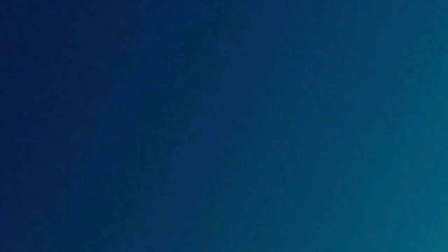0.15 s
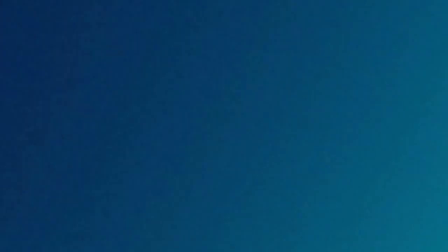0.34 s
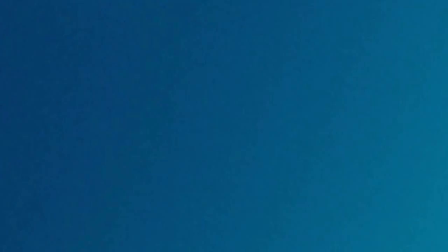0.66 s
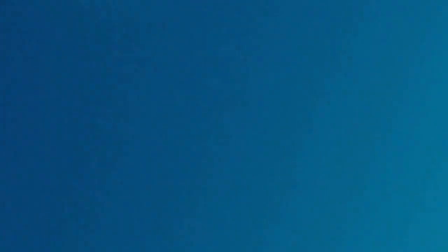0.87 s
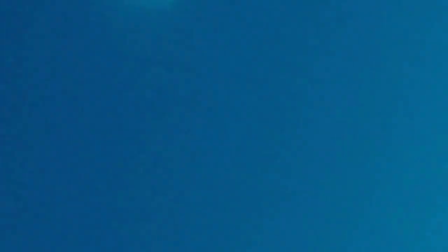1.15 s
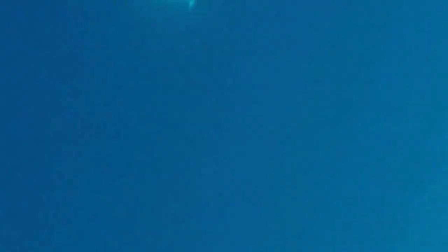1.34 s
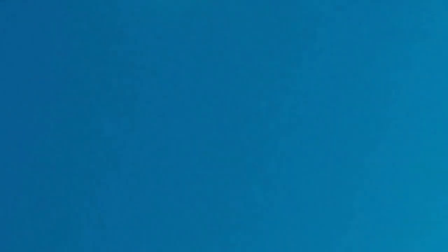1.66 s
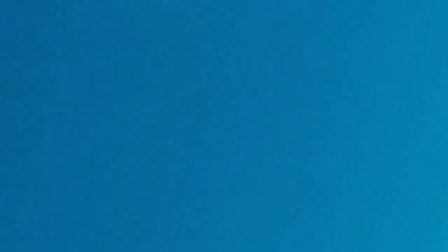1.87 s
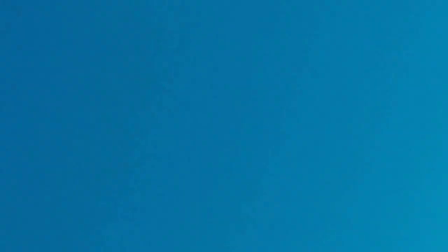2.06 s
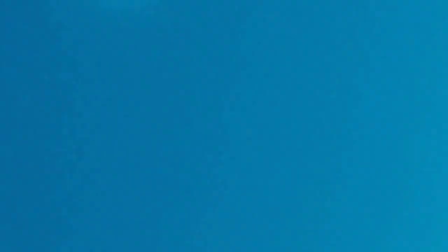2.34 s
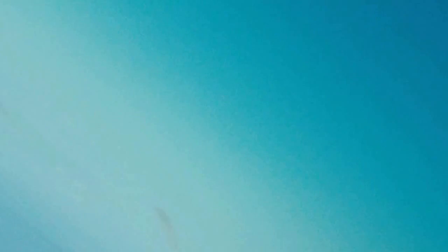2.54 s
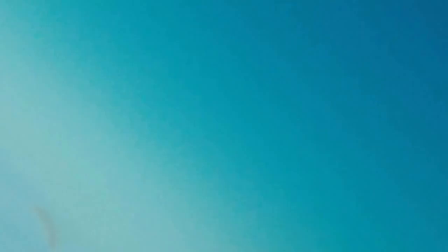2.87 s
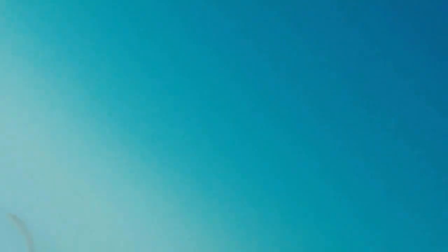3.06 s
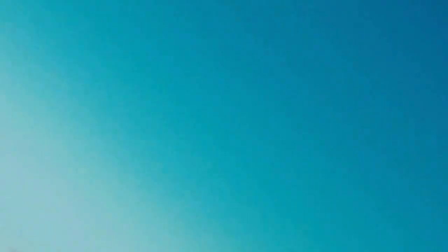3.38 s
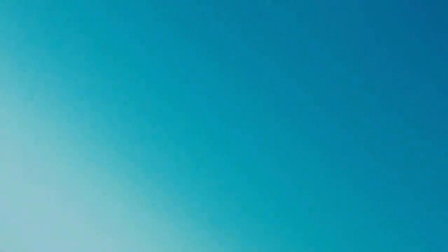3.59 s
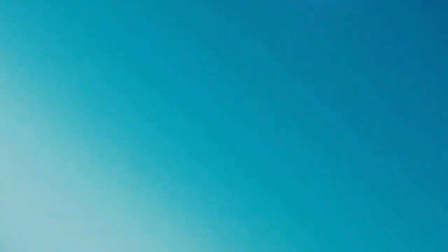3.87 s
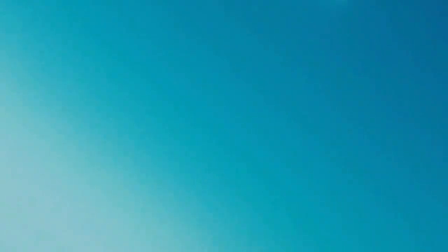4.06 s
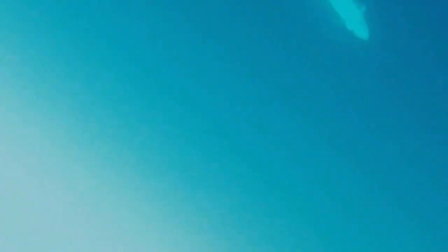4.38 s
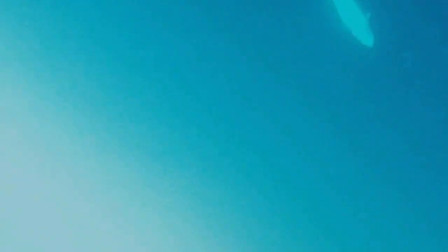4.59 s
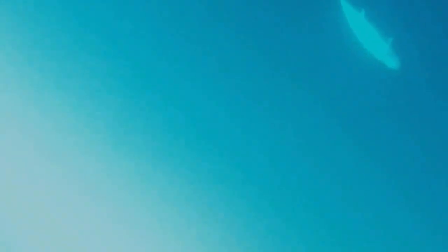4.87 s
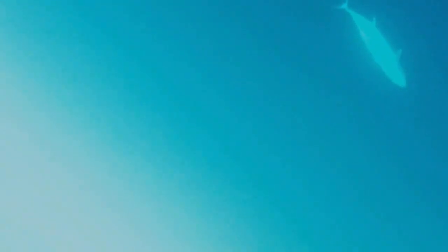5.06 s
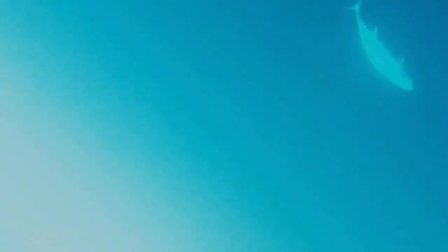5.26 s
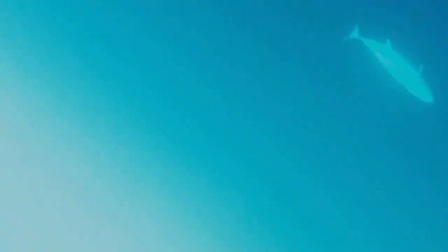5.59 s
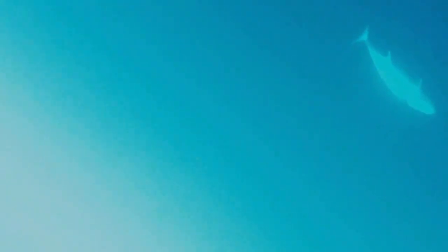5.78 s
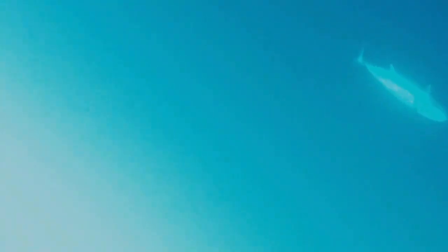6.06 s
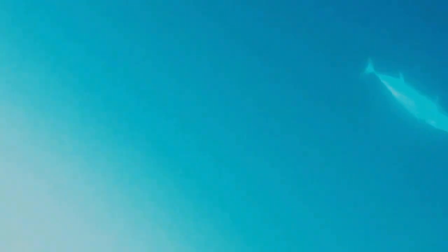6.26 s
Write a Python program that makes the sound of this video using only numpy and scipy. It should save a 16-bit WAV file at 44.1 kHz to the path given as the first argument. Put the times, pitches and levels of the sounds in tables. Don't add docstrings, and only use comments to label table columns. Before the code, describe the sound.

Loud distorted gurgles and crackling bubbles as a microphone is dunked in water, settling into deep rumbling surges, faint clicks and a late knock.

```python
import sys
import numpy as np
from scipy import signal
from scipy.fft import rfft, irfft, next_fast_len
from scipy.io import wavfile
from scipy.ndimage import map_coordinates

SR = 44100
rng = np.random.default_rng(int(sys.argv[2]) if len(sys.argv) > 2 else 0)


def put_to_file(sound):
    columns = np.atleast_2d(sound).T
    safe = np.clip(columns, -1, 1)
    whole_steps = np.round(safe * 32767)
    wavfile.write(sys.argv[1], SR, whole_steps.astype(np.int16))


def nominal_scale(level):
    x = np.asarray(level, float) / 20
    return 10 ** x


N = 283640
TIME_S = np.arange(N) / SR
AIR_SPENT_S = 2.35


def unit(x):
    return x / np.sqrt(np.mean(np.abs(x) ** 2) + 1e-20)


def curves(rows):
    start_s, *columns = np.transpose(rows)
    return [np.interp(TIME_S, start_s, column) for column in columns]


def wobble(rate_hz):
    knots = rng.standard_normal(int(N * rate_hz / SR) + 4)
    return map_coordinates(knots, [np.arange(N) * rate_hz / SR])


def filtered(x, response):
    size = next_fast_len(len(x) + 8192)
    spectrum = rfft(x, size) * response(np.fft.rfftfreq(size, 1 / SR))
    return irfft(spectrum, size)[:len(x)]


def colour(points):
    point_hz, level_db = np.transpose(points)
    return lambda hz: nominal_scale(np.interp(np.log(hz + 1), np.log(point_hz + 1), level_db))


def noise(points):
    return unit(filtered(rng.standard_normal(N), colour(points)))


def resonances(modes):
    def response(f):
        total = 0
        for k, (centre, width, db) in enumerate(modes):
            damping = 1j * f * width
            total = total + (-1) ** k * nominal_scale(db) * damping / (centre * centre - f * f + damping)
        return total
    return response


def ports(x, weak_db, lag_s=0., own=None, share=0.):
    right = filtered(x, lambda hz: np.exp(-2j * np.pi * hz * lag_s))
    if own is not None:
        right = np.sqrt(1 - share) * right + np.sqrt(share) * own
    return np.array([x, nominal_scale(weak_db) * right])


def swells(rows, rise_s):
    power = 0
    for start_s, peak_db, t60_s in rows:
        since = TIME_S - start_s
        power = power + nominal_scale(2 * peak_db - 155 * np.where(since < 0, -since / rise_s, since / t60_s))
    return np.sqrt(power)


# centre_s, change_db, length_s
LULLS = [(.235, 4, .03), (.77, 4, .06), (1.015, -9, .012), (1.5, -10, .012), (1.556, -7, .014),
         (.47, -6, .02), (.06, -8, .014), (.605, -6, .012), (.657, -8, .014), (0.901, -10, 0.05),
         (1.315, -16, 0.019), (1.65, -10.5, 0.044), (1.822, -12, 0.03), (1.967, -4.5, 0.041),
         (2.092, -10, 0.043), (2.223, -13, 0.024)]


def falter():
    return sum(db * np.exp(-((TIME_S - start_s) / length_s) ** 2) for start_s, db, length_s in LULLS)


# start_s, pitch_hz
DRUM_PITCH = [(0, 69.29), (.21, 54.65), (.5, 50.51), (.75, 55.68), (.99, 49.07), (1.13, 58.71),
              (1.21, 82.24), (1.31, 57.84), (1.45, 50.88), (2.09, 61.25), (2.29, 54.98), (2.65, 65.23),
              (3.04, 59.47), (3.69, 65.35), (3.83, 62.04), (5.37, 66), (5.73, 58.6), (6.43, 63)]


def drumming(drum_db, falter_db):
    phase = 2 * np.pi * np.cumsum(curves(DRUM_PITCH)[0] + 5 * wobble(14)) / SR
    tone = unit(nominal_scale(3.4 * wobble(12)) * np.sin(phase))
    spent_db = -8 * np.clip((TIME_S - AIR_SPENT_S) / .1, 0, 1)
    return nominal_scale(drum_db + 3.5 - 0.33 * TIME_S + falter_db + spent_db) * tone


# peak_s, peak_db, fade_s (for 77.5 dB)
WASH = [(.1, -14, 0.27), (.28, -3, 0.52), (.6, -21.5, 0.37), (.71, -14, 0.42), (.98, -34, 1),
        (1.17, -22, 0.63), (1.36, -31, 2.7), (1.54, -16.5, 0.24), (1.76, -15, 0.26), (2.09, -14, 0.15),
        (2.33, -10.5, 0.27), (2.76, -22, 0.65), (2.85, -19, 0.16), (2.99, -20, 0.095), (3.28, -26, 0.25),
        (3.37, -23.5, 0.26), (3.68, -28.5, 0.31), (4.06, -26, 0.072), (4.16, -32, .35), (4.53, -36.5, 0.71),
        (4.87, -36, 0.32), (6.06, -34.5, 0.39)]
# pitch_hz, level_db
EDDY = [(70, -44), (120, 13), (180, 4), (300, -2.5), (600, -11), (1200, -22), (3000, -63)]


def eddies():
    gain = swells(WASH, 0.18) + nominal_scale(-49)
    return gain * nominal_scale(5.0 + 4.7 * wobble(22.015)) * noise(EDDY)


# centre_s, peak_db, pitch_hz, glide_hz_per_s, length_s (at half height)
SURGES = [(2.452, -3.5, 48.8, 396, .12), (2.622, 2, 62.37, 53.5, 0.24), (2.753, -2.5, 65.4, 93, 0.09),
          (2.871, 2, 30.8, 5, 0.054), (2.93, -1, 60.9, 51, 0.15), (3.101, -2, 58.9, 148, .12),
          (3.2, -4, 41, 2, 0.064), (3.338, 2.5, 29, 6, 0.098), (3.399, -4, 65, -14, 0.11),
          (3.578, -0.5, 42.35, 237, 0.163), (3.716, -6.5, 67.1, -100, 0.22), (3.801, -11, 55.5, -100, .1),
          (3.89, -3.5, 30.14, 54, .14), (4.0, -3, 51.65, 248, 0.22), (4.098, -4, 64.2, 2, 0.32),
          (4.144, -1.5, 29.4, 0, 0.13), (4.261, -4, 64.3, 0, 0.19), (4.362, -5.5, 66.5, 3, .1),
          (4.409, -4, 28.4, 2, 0.12), (4.521, -1, 57, 102, 0.11), (4.667, -5, 31.51, 5, 0.19),
          (4.723, -5, 65.3, 0, 0.12), (4.842, -7.5, 30.5, 0, 0.12), (4.911, -14.5, 102, 0, 0.095),
          (4.999, -13, 89, 0, 0.059), (3.741, -14.5, 130.1, 3, 0.041), (2.785, -13, 119, 5, 0.059),
          (5.02, -2, 58.1, 0, 0.047), (5.165, -8, 54, 100, 0.11), (5.273, -7.5, 30.43, 0, 0.052),
          (5.382, -10.5, 75, 3, 0.14), (5.434, -5, 37.5, 0, 0.063), (5.562, -4.5, 47.1, 0, 0.074),
          (5.811, -3, 47.4, 197, 0.11), (5.95, -13.5, 30, 204, 0.079), (6.082, -3.5, 27.1, 0, 0.079),
          (6.171, -8.5, 54.5, 243, 0.12), (6.361, -8.5, 66.1, 2, 0.38)]


def surges():
    out = np.zeros(N)
    for (start_s, db, hz, glide, length_s), turn in zip(SURGES, rng.random(len(SURGES))):
        near = np.arange(int((start_s - length_s) * SR), min(int((start_s + length_s) * SR), N))
        t = near / SR - start_s
        window = np.cos(np.pi * t / (2 * length_s)) ** 2
        out[near] += nominal_scale(db) * window * np.sin(2 * np.pi * (turn + hz * t + glide * t * t / 2))
    return out


# start_s, slosh_db, drumming_db
FLOW = [(0, -12, -8), (.28, -2, 4.5), (.56, -5.5, -4.5), (.98, -18, 0.5), (1.12, 0, -2), (1.6, -15.5, -3),
        (1.96, -29, -5), (2.24, -11.5, -5.5), (2.38, 0, -8), (2.6, -13.5, -4), (2.87, -1, -3.5),
        (3.3, -10, -7.5), (3.5, -10, -3), (3.66, -9.5, -2.5), (3.88, -16, -13), (4.06, -6.5, -3),
        (4.4, -12.5, -13.5), (6.43, -16, -8.5)]
# pitch_hz, level_db
SLOSH = [(4, -57), (10, -4), (27, 9.5), (40, 10.5), (60, -29.5), (120, -72.5)]
# pitch_hz, level_db
SWIRL = [(25, -40), (45, 3), (72, 4.5), (90, -0.5), (130, -15), (200, -39.5), (400, -87)]


def flow():
    slosh_db, drum_db = curves(FLOW)
    falter_db = falter()
    slosh = nominal_scale(slosh_db + 1.92 + 2.32 * wobble(5)) * noise(SLOSH)
    swirl = nominal_scale(drum_db - 2.0 + 2.97 * wobble(8)) * noise(SWIRL)
    stream = (slosh + swirl) * nominal_scale(0.53 * falter_db - 3.14 * (TIME_S > AIR_SPENT_S))
    push = stream + drumming(drum_db, falter_db) + eddies() + surges()
    leak = lambda hz: .14 / (1 - (hz / 39) ** 2 + 1j * hz / 38) + .065
    return np.array([push, filtered(push, leak)])


# start_s, peak_db, pitch_hz, rise_share, t60_s
BUBBLES = [(.0454, -19, 2540, 0.25, 0.05), (0.0483, -10, 1280, 0.2, 0.085),
           (0.1264, -17.5, 1940, .05, 0.025), (.1325, -10, 2000, .03, 0.025), (0.28, -6, 560, .7, 0.032),
           (.366, -6, 1930, .03, 0.024), (0.1274, -8.5, 860, 0.26, 0.025), (0.181, -34, 1054, 0.077, 0.058),
           (.294, -28, 376, 0.55, 0.03), (0.3487, -5.5, 632, -0.19, 0.05), (.356, -2, 1812, .04, 0.03),
           (.4015, -5, 545, .17, 0.13), (0.446, -21, 1242, 0.049, 0.12), (.4455, -6, 660, 0.16, 0.045),
           (0.533, -19, 1060, 0.02, 0.058), (0.5934, -9, 486, 0.018, 0.085),
           (0.646, -29.5, 1880, 0.0075, 0.12), (0.7012, -8, 600, -0.12, 0.015),
           (0.7085, -27, 403, 0.086, 0.076), (.709, -28, 1610, -0.02, 0.02), (.47, -15.5, 819, 0.26, 0.046),
           (.482, -20, 960, 0.25, 0.027), (.296, -28, 800, .15, 0.043), (0.8371, -15.5, 1695, -.03, 0.046),
           (0.838, 0.5, 640, 0.079, 0.034), (.8528, -30, 765, 0.18, 0.089), (0.893, -20.5, 740, .12, 0.059),
           (1.173, -20.5, 1730, .1, 0.016), (1.169, -21, 1080, -0.1, 0.025),
           (1.172, -16, 370, -0.19, 0.025), (2.3135, -23, 574, -.066, .065),
           (2.315, 1.5, 2272, -0.16, 0.026)]
# start_s, peak_db, pitch_hz, t60_s
POPS = [(0.039, 15, 2427, 0.0096), (.0554, -35, 3730, 0.1), (0.0848, 1, 2620, 0.0092),
        (.09, -13, 1880, 0.0056), (0.1, -31, 1900, 0.034), (0.1128, -8, 2700, 0.0099),
        (.1472, -18, 805, 0.0093), (.2075, -6, 1344, 0.012), (0.225, -22.5, 2420, 0.022),
        (.277, -13, 1960, 0.014), (.381, -14, 705, 0.021), (0.388, -15, 684, 0.018),
        (0.582, -24.5, 2050, 0.019), (.288, 21.5, 2780, 0.0077), (.294, -17, 1740, 0.013),
        (0.326, -18, 3230, 0.011), (0.328, -19.5, 1600, 0.032), (0.418, -20.5, 2420, 0.088),
        (0.473, -15, 1730, 0.03), (0.504, -17, 1990, 0.026), (0.529, 5.5, 1895, 0.014),
        (0.535, -24, 2900, 0.012), (0.594, -20, 1590, 0.07), (0.684, -19, 1870, 0.026),
        (0.895, -13.5, 2044, 0.038), (0.985, -19, 1570, 0.019), (1.012, -26.5, 566, 0.034),
        (1.013, -28, 1000, 0.017), (1.176, -25, 697, 0.025), (1.213, -29, 960, 0.028),
        (.09, -10, 5400, .008), (.127, -8, 3500, .008), (.35, -5, 930, .03), (.359, -12, 5700, .01),
        (.359, -14, 2900, .01), (.428, -18, 4300, .012), (.504, -19, 5100, .012), (.5715, -21, 4900, .008),
        (.644, -31, 4500, .012), (.694, -24, 600, .015), (.183, -17, 1000, .022), (.001, -22, 1700, .012),
        (1.5, -34, 849, 0.024), (1.518, -33, 2140, 0.0063), (1.551, -31, 1260, 0.013),
         (1.562, -30, 5340, 0.007), (1.571, -39, 1060, .012), (1.562, -35, 3100, .008),
         (1.498, -35, 2620, .015), (3.471, -30, 3750, 0.015), (3.471, -33, 2850, 0.01),
         (3.199, -33, 3760, .012), (3.148, -37, 3810, .012), (6.2547, -33, 2400, .008),
         (1.946, -31, 2850, 0.026), (1.737, -31, 1800, 0.013), (1.764, -15, 1928, 0.03),
         (1.767, -22, 1604, 0.039), (1.8798, -15.5, 2150, 0.011), (1.925, -17.5, 3420, 0.019),
         (1.928, -25, 1010, 0.02), (2.0145, -24.5, 1700, 0.065), (2.0384, -22, 2150, 0.018),
         (2.0403, -26, 950, 0.022), (2.069, -21, 850, 0.012), (2.0829, -20, 1850, 0.02),
         (2.097, -18, 2250, 0.012), (2.107, -13.5, 1100, 0.025), (2.112, -10, 884, 0.0091),
         (2.115, -24, 1730, 0.055), (2.183, -12.5, 1930, 0.015), (2.243, -4.5, 1965, 0.012),
         (2.2766, 14.5, 1950, 0.017), (2.291, -18, 1880, 0.0082), (2.324, -2, 2510, 0.022),
         (2.317, -14, 3100, .012), (2.326, -14, 3100, .012), (5.9035, -33, 3900, .01),
         (6.2547, -34, 7500, .005), (6.279, -28, 366, .06), (6.4311, -26, 500, .01),
         (4.538, -36, 600, 0.049), (6.2771, -20.5, 400, .014), (6.278, -39, 1091, .008),
         (3.305, -38, 604, 0.042), (3.376, -41, 835, .02)]
# start_s, peak_db, pitch_hz
GULPS = [(.965, -31, 200), (1.175, -27, 250), (2.421, -28.5, 128), (2.545, -29, 158), (2.656, -27.5, 176),
         (2.784, -24, 133.4), (2.97, -34, 152), (3.081, -32, 183), (3.276, -24.5, 161), (3.665, -24, 127),
         (4.033, -31, 194.6), (4.158, -45, 157.9), (4.518, -40.5, 191.2), (4.70, -41, 202.6),
         (5.49, -38, 138), (6.069, -33, 140), (6.294, -29, 135.4), (6.371, -27.5, 120.6)]


def bubbles():
    out, t = np.zeros(N + SR), np.arange(SR // 6) / SR
    pops = [(start_s, db, hz, -0.0086, t60) for start_s, db, hz, t60 in POPS]
    gulps = [(*gulp, .06, 0.11) for gulp in GULPS]
    tremble, flutter = np.pad([wobble(260), wobble(180)], ((0, 0), (0, SR)))
    for start_s, db, hz, rise, t60 in BUBBLES + pops + gulps:
        first = round(start_s * SR)
        here = slice(first, first + len(t))
        glide = 1 + rise * np.minimum(t / (0.2413 * t60), 1.6) ** 1.25 + 0.014 * tremble[here]
        onset = 1 - np.exp(-t * hz / 0.33)
        ring = np.sin(2 * np.pi * np.cumsum(hz * glide) / SR) * onset
        out[here] += nominal_scale(db + 24 - 60 * t / t60 + 2.7 * flutter[here]) * ring
    return ports(out[:N], -27.5, -1 / SR)


# start_s, rms_db, centre_hz, t60_s
SNAPS = [(0.0171, -18.5, 3800, 0.0091), (0.0398, 0, 2400, 0.012), (.0562, -11, 1940, 0.014),
         (0.0662, -18.5, 1950, 0.0089), (.0845, -4, 3040, 0.015), (.09, -8, 2320, 0.0099),
         (.267, -41.5, 2500, 0.017), (.186, -32.5, 2480, 0.012), (.2274, -19, 1500, 0.008),
         (0.1118, -32.5, 2900, 0.051), (0.126, 3, 3130, 0.0084), (0.2075, -6, 1810, 0.0067),
         (0.243, -10, 2460, 0.01), (0.275, -29, 4240, 0.051), (0.2876, -4.5, 2850, 0.017),
         (0.3203, -16.5, 2980, 0.017), (0.3447, -5, 3740, 0.015), (0.358, -5.5, 3230, 0.015),
         (0.3992, -18, 2049, 0.0046), (.4277, -28, 2370, 0.033), (.5038, -21, 3580, 0.019),
         (.529, -22, 2200, 0.0095), (0.5391, -22, 1837, 0.0072), (0.5713, -27, 4640, 0.0097),
         (.6436, -32, 2700, 0.021), (0.685, -43, 1960, 0.057), (0.702, -25.5, 1630, 0.02),
         (0.838, -40, 2500, 0.022), (.8925, -28.5, 1890, 0.015), (1.156, -34, 2000, 0.013),
         (1.167, -35, 1690, 0.02), (1.174, -26, 1690, 0.01), (0.546, -30, 2270, 0.021),
         (.14, -27.5, 2600, 0.038),
         (1.497, -41, 2640, 0.015), (1.5625, -39, 5500, 0.009), (1.766, -7, 2660, 0.0092),
         (1.8785, -27.5, 2680, 0.017), (1.9253, -20, 2760, 0.02), (1.9438, -25, 2630, 0.0089),
         (2.0148, -34, 1929, 0.029), (2.0702, -28, 1500, 0.0099), (2.082, -17, 3600, 0.0077),
         (2.0955, -14, 3700, .011), (2.112, -14, 1740, 0.016), (2.1825, -7, 5350, 0.0068),
         (2.2052, -36, 2977, 0.055), (2.2202, -22, 3300, 0.01), (2.243, -12, 2981, 0.0095),
         (2.2534, -15, 1980, 0.016), (2.2783, -8, 2000, 0.016), (2.293, -14, 3683, 0.0052),
         (2.159, -34, 2512, .015), (2.368, -39, 3011, 0.0052), (1.99, -47, 3500, 0.012),
         (2.315, -8.5, 2260, 0.027), (2.325, -12, 2390, 0.014), (2.343, -31.5, 2180, .031)]
# start_s, rms_db, centre_hz
TICKS = [(2.84, -38, 1800), (3.0398, -40.5, 2029), (3.0947, -41, 2385), (3.1477, -29, 3200),
         (3.198, -24.5, 3950), (3.4715, -36, 2700), (4.0006, -39, 1860), (4.226, -42, 3910),
         (4.2603, -35, 3970), (4.3493, -36.5, 3920), (4.4575, -32, 3200), (4.476, -47, 2270),
         (4.531, -37.5, 2184), (4.5757, -39, 3820), (5.4847, -41, 2150), (5.7568, -39.5, 3840),
         (5.903, -32, 4020), (6.125, -40, 4580), (6.2547, -28, 3600), (6.4146, -38.5, 3890)]
# pitch_hz, level_db
TEAR = [(400, -23), (1200, -2), (2100, 6.5), (3000, -1.5), (3900, 3.5), (5200, -3), (9000, -2.5),
        (11500, -14), (15500, -24)]


def snaps():
    out, t = np.zeros((2, N + SR)), np.arange(SR // 20) / SR
    ticks = [(*tick, 0.0076) for tick in TICKS]
    for start_s, db, hz, t60 in SNAPS + ticks:
        peak = resonances([(hz, .3 * hz, 0)])
        shape = lambda f: colour(TEAR)(f) * (0.089 + np.abs(peak(f)))
        bursts = np.array([unit(filtered(v, shape)) for v in rng.standard_normal((2, len(t)))])
        envelope = nominal_scale(db + 27.5 - 60 * t / t60) * (1 - np.exp(-t / 0.001))
        first = round(start_s * SR)
        out[:, first:first + len(t)] += envelope * bursts
    return ports(out[0, :N], -27.5, -1 / SR, out[1, :N], share=0.29)


# peak_s, peak_db, fade_s (for 77.5 dB)
FROTH = [(.04, -28, 0.93), (.14, -19.5, 0.5), (.28, -25, 1.2), (.47, -25, 0.45), (1.0, -39.5, 0.16),
         (1.17, -42, 0.43), (1.55, -56, 3.5), (1.95, -43, 0.83), (2.1, -32, 0.35), (2.22, -31, 0.32)]
# pitch_hz, level_db
FOAM = [(400, -3.5), (2000, 4.5), (4000, -4), (7000, -16), (15000, -43)]


def froth():
    when, pitch, size, life = rng.random((1500, 4)).T
    t = np.arange(400)[None] / SR
    hz = 550 * np.exp(2.4 * pitch)[:, None]
    cycles = 1.26 + life[:, None] ** 4 * hz / 700
    chirp = np.sin(2 * np.pi * hz * t * (1 + 22 * t))
    grain = nominal_scale(-3 * np.log(size + 0.01))[:, None] * chirp * np.exp(-t * hz / cycles)
    where = (when * AIR_SPENT_S * SR).astype(int)[:, None] + np.arange(400)
    fizz = filtered(np.bincount(where.ravel(), grain.ravel(), N)[:N], colour(FOAM))
    clumps = unit(fizz * nominal_scale(2.1 * wobble(60)))
    spray = nominal_scale(-15 + 3.1 * wobble(40.3)) * noise(TEAR)
    return ports(nominal_scale(8) * swells(FROTH, 0.55) * (clumps + spray), -24.5)


def pocket(x):
    t = np.arange(SR // 8) / SR
    tail = rng.standard_normal((2, len(t))) * nominal_scale(-60 * t / 0.021)
    tail = tail / np.linalg.norm(tail[0])
    return x + nominal_scale(-19) * signal.fftconvolve(x, tail, axes=1)[:, :N]


# start_s, level_db, t60_s
KNOCKS = [
    (2.83, -34, 0.043),
    (3.342, -32, 0.048),
    (3.66, -19.5, 0.1),
    (4.53, -28, 0.042),
    (6.07, -28, 0.086),
    (6.276, -9.5, 0.079),
]
# pitch_hz, width_hz, level_db
CASE = [(142, 54, -5), (229, 20, 5), (343, 106, -10.5), (475, 32, 4), (600, 41, 2)]


def knocks():
    shake, t = np.zeros(N + SR), np.arange(SR // 4) / SR
    for start_s, db, t60 in KNOCKS:
        first = round(start_s * SR)
        shake[first + 60] += nominal_scale(db + 50.5)
        scrape = nominal_scale(db + 27 - 60 * t / t60) * (1 - np.exp(-t / 0.00081))
        shake[first:first + len(t)] += scrape * rng.standard_normal(len(t))
    soft = lambda hz: resonances(CASE)(hz) / (1 + 1j * hz / 900) ** 2
    return ports(filtered(shake[:N], soft), -27)


# pitch_hz, level_db
SEA = [(180, 0.5), (315, 1), (400, -5.5), (511, 4.5), (785, -10), (1000, -6.5), (1300, -14), (2030, -7),
       (2840, -15), (3850, -9.5), (5000, -17.5), (9000, -23), (10800, -31.5), (15500, -36)]


def sea():
    swell = nominal_scale(-30 + .8 * wobble(5) + .8 * wobble(30))
    return ports(swell * noise(SEA), -27.5, -1 / SR, swell * noise(SEA), share=0.25)


def scene():
    return flow() + pocket(bubbles() + snaps() + froth()) + knocks() + sea()


def band_limit(x):
    return signal.sosfilt(signal.butter(12, 15450, fs=SR, output="sos"), x)


def record(dry):
    clipped = dry / (1 + np.abs(dry / .99) ** 14) ** (1 / 14)
    clipped[0] += nominal_scale(-41.5) * filtered(noise(SEA), lambda hz: 1 / (1 + (hz / 9500) ** 4))
    capacitor = lambda hz: (1j * hz + 0.66) / (1j * hz + 2.9)
    coupled = [filtered(v, capacitor) for v in clipped]
    return band_limit(np.clip(coupled, -1, 1))


dry = scene()
out = record(dry)
put_to_file(out)
```